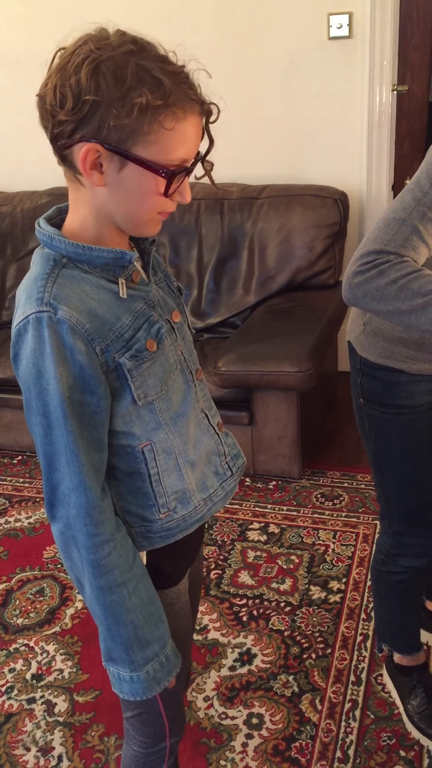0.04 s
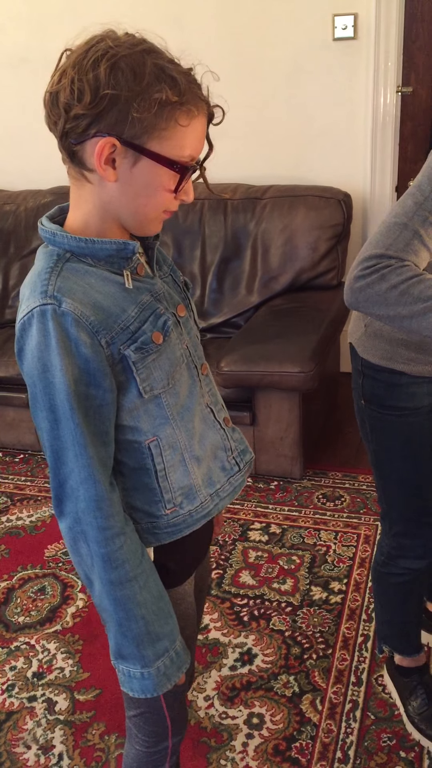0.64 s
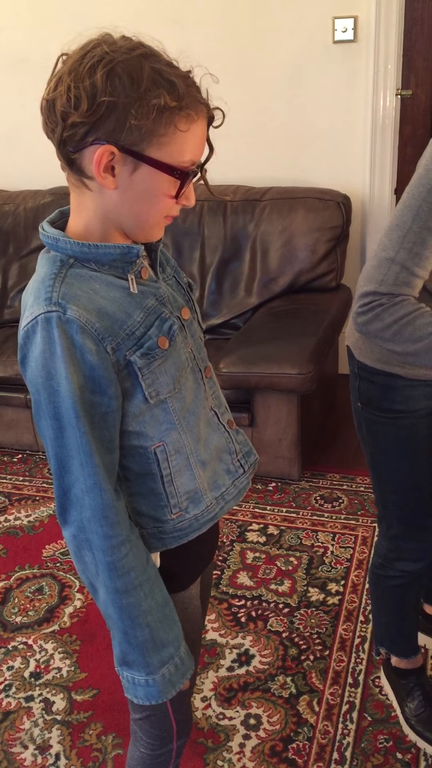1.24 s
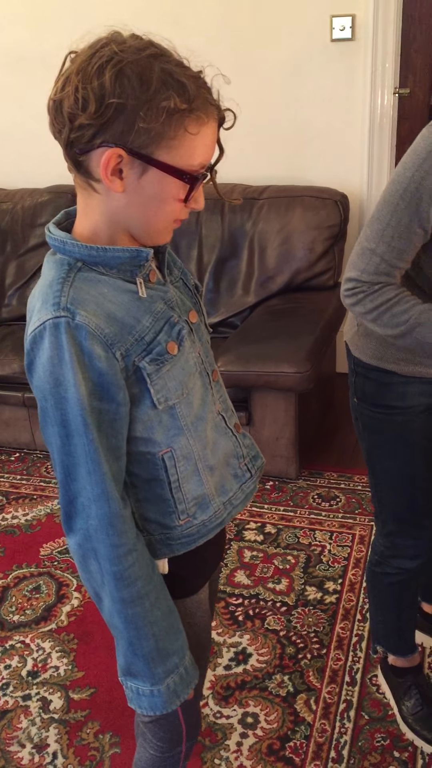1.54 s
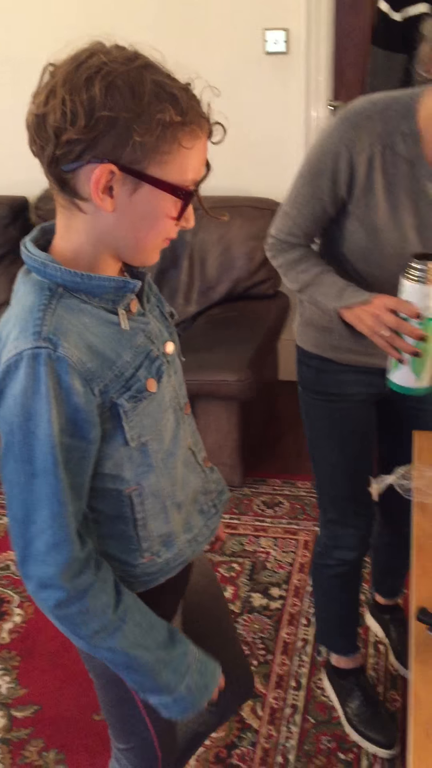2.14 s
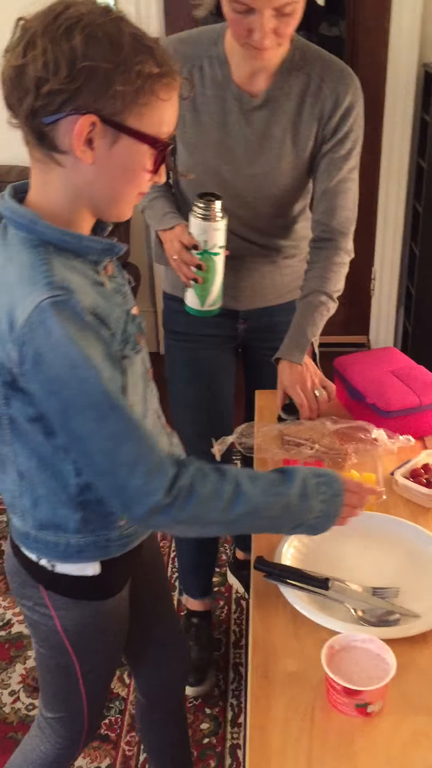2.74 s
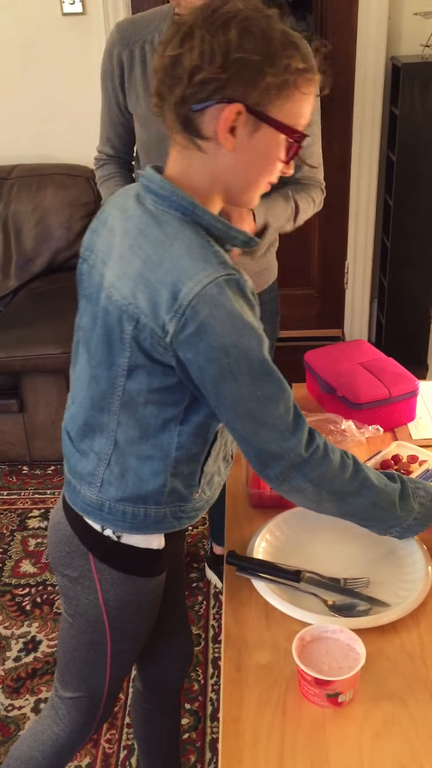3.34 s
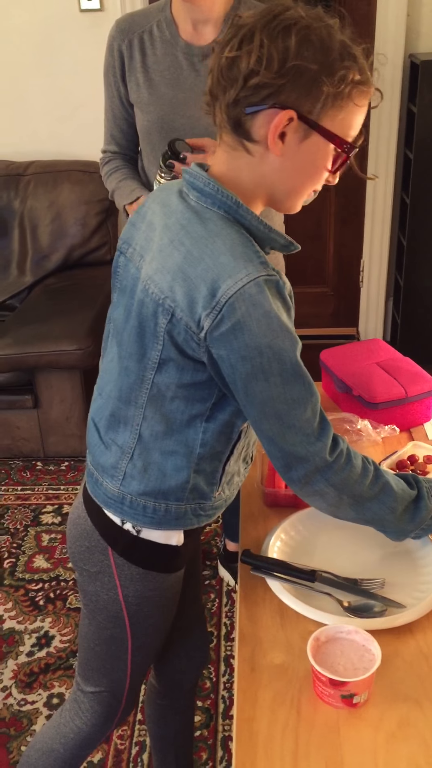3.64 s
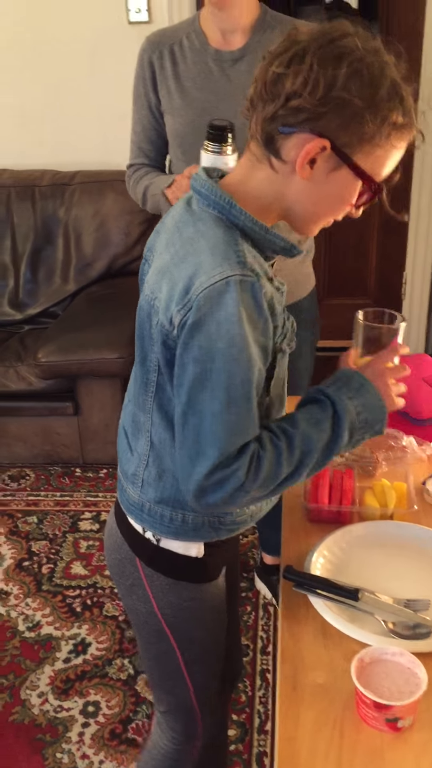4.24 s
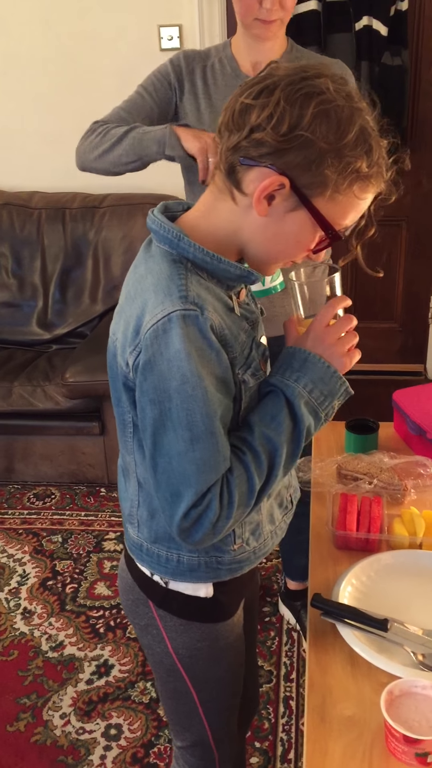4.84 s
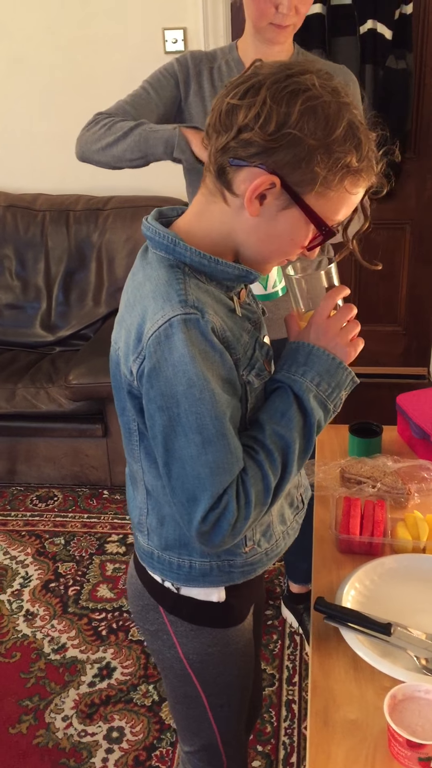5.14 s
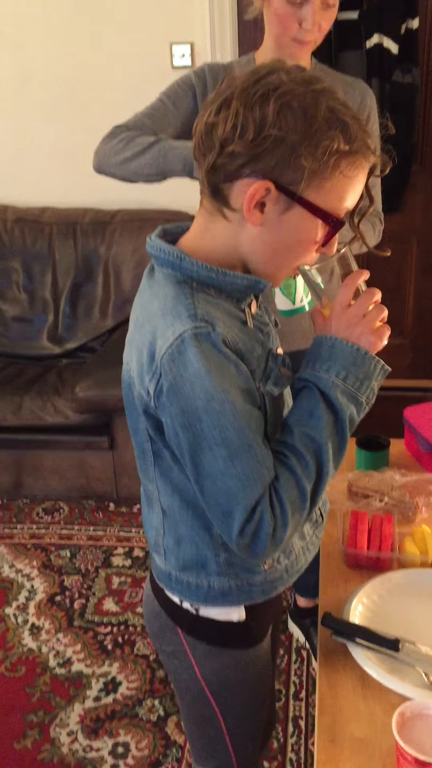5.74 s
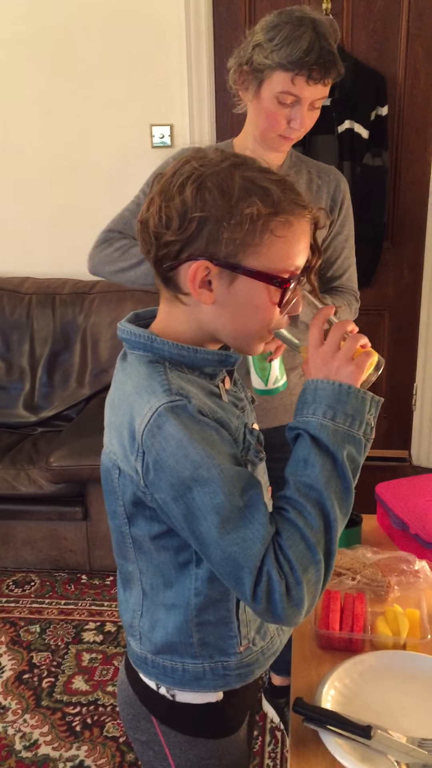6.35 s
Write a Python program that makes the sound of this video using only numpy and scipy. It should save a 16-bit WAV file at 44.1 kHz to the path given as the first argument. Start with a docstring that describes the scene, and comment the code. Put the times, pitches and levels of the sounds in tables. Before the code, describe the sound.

A living room rumbles faintly throughout, with a quiet hiss. Small pings and ticks sound in the first second, and a drinking glass clinks once at about 1.1 seconds. At 1.7 seconds a dull, heavy thump, the loudest sound, sets a wooden table ringing. Hard knocks on the wood follow until about 2.6 seconds. Near 3 seconds food wrap rustles very faintly and things slide softly over the table. From 3.6 to about 4.4 seconds a stopper clinks and rattles in a steel flask in quick, uneven touches, while a container bumps the table with short, low notes. Two knocks near 4.7 seconds leave the table ringing with a hollow note. Faint metallic clinks and ticks continue from 5 to 6 seconds, then only the room remains until about 6.5 seconds. Everything sounds fairly close, with a short room echo.

```python
"""A living room rumbles faintly. Small pings and ticks sound, and a glass clinks once at 1.1 s.
At 1.7 s a dull thump sets a wooden table ringing, and hard knocks on the wood follow.
Near 3 s food wrap rustles and things slide. From 3.6 s a stopper clinks and rattles in a steel flask,
and a container bumps the table. Two knocks near 4.7 s leave the table ringing with a hollow note.
Faint clinks and ticks end it."""
import sys
import numpy as np
from scipy import signal
from scipy.fft import rfft, irfft, next_fast_len
from scipy.io import wavfile

SR = 44100
rng = np.random.default_rng(int(sys.argv[2]) if len(sys.argv) > 2 else 0)


def to_wav(sig):
    """Store sig (one row per channel, or 1-D mono) as 16-bit WAV at the path in sys.argv[1].

    Samples outside -1..1 are clipped; the rate is SR.
    """
    pcm = np.clip(np.atleast_2d(sig), -1, 1) * 32767
    pcm = np.round(pcm).astype(np.int16)
    wavfile.write(sys.argv[1], SR, pcm.T)  # frames by channels


N = 287091
SIZE = 32768   # samples per event
T, HZ = np.arange(SIZE) / SR, np.maximum(np.fft.rfftfreq(SIZE, 1 / SR), 1)


def from_db(db):
    """Decibels to gain."""
    return 10 ** (np.asarray(db) / 20)


def unit(x):
    """Scale to unit energy."""
    return x / np.sqrt(np.sum(x ** 2) + 1e-20)


def at_hz(points, hz):
    """Interpolate a table over log frequency."""
    f, value = np.transpose(points)
    return np.interp(np.log(hz), np.log(f), value)


def swell(time_s, db, half_s):
    """Bell-shaped gain around time_s."""
    return from_db(db) * np.exp(-((np.arange(N) / SR - time_s) / half_s) ** 2)


def add(out, time_s, sound):
    """Mix a sound in at time_s."""
    start = max(round(time_s * SR), 0)
    out[start:start + len(sound)] += sound[:N - start]


def pulse(gain):
    """Minimum-phase pulse with this spectrum; unit energy."""
    cepstrum = irfft(np.log(gain + 1e-9))
    cepstrum[1:SIZE // 2] *= 2
    cepstrum[SIZE // 2 + 1:] = 0
    return unit(irfft(np.exp(rfft(cepstrum))))


def bend(sound, travel_s):
    """Higher bending waves cross a plate faster, smearing a click; travel_s holds at 1 kHz."""
    return irfft(rfft(sound) * np.exp(-4j * np.pi * travel_s * np.sqrt(HZ * 1000)))


def coloured(x, spectrum):
    """Shape a scene-long signal by a spectrum; unit rms."""
    size = next_fast_len(N)
    hz = np.maximum(np.fft.rfftfreq(size, 1 / SR), 1)
    shaped = irfft(rfft(x, size) * from_db(at_hz(spectrum, hz)), size)
    return unit(shaped[:N]) * np.sqrt(N)


def ring(hz, level_db, t60_s, phase):
    """Decaying modes struck together; unit energy."""
    t = T[:SIZE // 2]
    return unit(sum(from_db(db - 60 * t / decay_s) * np.sin(2 * np.pi * f * t + angle)
                    for f, db, decay_s, angle in zip(hz, level_db, t60_s, phase)))


# reverberation decay: (frequency [Hz], t60 [s])
ROOM_DECAY = [(100, 0.14), (400, 0.51), (1000, 0.51), (2800, 0.4751), (7000, 0.32), (15000, 0.29)]
# reverberation spectrum: (frequency [Hz], gain [dB])
ROOM_SPECTRUM = [(100, 8), (300, 4.5), (1200, 1), (2500, 4), (4000, 1.5), (8000, 3.5), (16000, -4.5)]
def room(sound, wet_db, near_db, near_s=0.0018, build_s=0.0039):
    """Direct sound, near reflections off the table and a diffuse tail, new for every spot."""
    centres_hz, t60_s = np.transpose(ROOM_DECAY)
    noise = rfft(rng.standard_normal(SIZE)) * from_db(at_hz(ROOM_SPECTRUM, HZ))
    shares = [np.interp(np.log(HZ), np.log(centres_hz), row) for row in np.eye(len(centres_hz))]
    tail = sum(irfft(noise * share) * from_db(-60 * T / decay_s) for share, decay_s in zip(shares, t60_s))
    tail *= 1 - np.exp(-T / build_s)
    response = from_db(wet_db) * tail / np.sqrt(SR * np.mean(t60_s) / np.log(10 ** 6))
    response += from_db(near_db) * unit(rng.standard_normal(SIZE) * T * np.exp(-2 * T / near_s))
    response[0] += 1
    return signal.fftconvolve(sound, response)[:SIZE]


# room hiss: (frequency [Hz], relative density [dB])
AIR_SPECTRUM = [(20, -36), (45, -5), (130, 0.5), (200, -4.5), (367, -7), (480, -13.5), (920, -14),
                (1330, -18), (1760, -17), (3000, -19.5), (7000, -25), (13500, -30), (16000, -32.5)]
# rumble swells: (peak time [s], half length [s], lower resonance [dB], upper resonance [dB])
RUMBLE_SWELLS = [(1.992, 0.24, -62, -58.5), (3.395, 0.4, -56.5, -66), (5.335, .1, -69, -64),
                 (6.284, 0.18, -66.5, -67.5)]
def background(air_db=-70.5, low_hz=62, low_db=-71.5, high_hz=105, high_db=-70.5, width_hz=15):
    """Quiet hiss, and a rumble wavering in the room's two lowest resonances."""
    out = from_db(air_db) * coloured(rng.standard_normal(N), AIR_SPECTRUM)
    for k, (hz, steady_db) in enumerate([(low_hz, low_db), (high_hz, high_db)]):
        band = signal.butter(2, [hz - width_hz / 2, hz + width_hz / 2], "band", fs=SR, output="sos")
        rumble = signal.sosfilt(band, rng.standard_normal(N + SIZE))[SIZE:]
        swells = sum(swell(time_s, db[k], half_s) for time_s, half_s, *db in RUMBLE_SWELLS)
        out += np.hypot(from_db(steady_db), swells) * rumble / np.std(rumble)
    return out


HANDLING_FROM_S = 2   # a faint, steady rustle starts here
# crinkling film: (frequency [Hz], relative density [dB])
WRAP_SPECTRUM = [(500, -22), (2000, -24), (6000, 6.5), (10000, 7), (13000, 11.5), (16000, 6.5)]
# crinkles: (peak time [s], level [dB], half length [s])
WRAP_SWELLS = [(2.796, -72, 0.048), (2.831, -70, .005), (2.923, -67, 0.048)]
def wrap(creases_per_s=2500, spread_db=2.5, steady_db=-92):
    """Thin food wrap crinkles in tiny snaps."""
    creases = rng.random(N) < creases_per_s / SR
    strength = from_db(spread_db * np.minimum(rng.exponential(1, N), 4))
    snaps = creases * strength * rng.choice([-1, 1], N)
    steady = from_db(steady_db) * (np.arange(N) / SR > HANDLING_FROM_S)
    return (steady + sum(swell(*row) for row in WRAP_SWELLS)) * coloured(snaps, WRAP_SPECTRUM)


# friction on wood: (frequency [Hz], relative density [dB])
SLIDE_SPECTRUM = [(200, -6), (500, -20), (800, -1.5), (1050, 2.5), (1400, -5), (2200, -11.5), (3500, -17),
                  (9000, -24.5)]
# slides: (peak time [s], level [dB], half length [s], pitch [ratio])
SLIDE_SWELLS = [(2.957, -60.5, 0.073, 0.99), (3.246, -73, 0.074, 1.93)]
def slides(steady_db=-81):
    """Things slide over the wood with a soft friction noise."""
    steady = from_db(steady_db) * (np.arange(N) / SR > HANDLING_FROM_S)
    out = steady * coloured(rng.standard_normal(N), SLIDE_SPECTRUM)
    for time_s, db, half_s, pitch in SLIDE_SWELLS:
        friction = coloured(rng.standard_normal(N), np.array(SLIDE_SPECTRUM) * [pitch, 1])
        out += swell(time_s, db, half_s) * friction
    return out


def tick(hz, q, wet_db):
    """A tiny hard contact with one resonance."""
    resonance = 1 / np.hypot(1, q * (HZ / hz - hz / HZ))
    return room(bend(pulse(resonance), travel_s=0.003), wet_db, near_db=-3, near_s=0.003)


# ticks: (time [s], level [dB], centre [Hz], Q [-])
TICK_EVENTS = [(0.633, -45, 1820, 7.4), (1.715, -33.5, 6760, 3.2), (2.04, -46, 5670, 1.5),
               (3.917, -20, 3940, 17), (4.959, -35, 3560, 31), (5.309, -31.5, 3460, 14),
               (5.445, -46.5, 12500, 6.2), (5.925, -37.5, 8150, 4.4)]
def ticks():
    """Scattered small, sharp contacts."""
    out = np.zeros(N)
    for time_s, db, hz, q in TICK_EVENTS:
        add(out, time_s, from_db(db) * tick(hz, q, wet_db=-7.5))
    return out


def ping(hz, length_s):
    """A tone that swells and is damped within milliseconds."""
    return unit(np.sin(2 * np.pi * hz * T) * np.sin(np.pi * np.minimum(T / length_s, 1)))


# pings: (time [s], frequency [Hz], level [dB])
PING_EVENTS = [(0.0, 1856, -36), (0.075, 2320, -43.5), (.319, 920, -47), (0.946, 940, -37.5),
               (.948, 1300, -40), (3.512, 1015, -40.5), (3.607, 1023, -29.5)]
def pings(cycles=14):
    """Faint pings and squeaks, all the same number of cycles long."""
    out = np.zeros(N)
    for time_s, hz, db in PING_EVENTS:
        add(out, time_s, from_db(db) * room(ping(hz, cycles / hz), wet_db=-1, near_db=-30))
    return out


# drinking glass: (frequency [Hz], relative level [dB], length [s])
GLASS_PARTIALS = [(1609, -1.5, 0.013), (1518, -9.5, 0.018), (3150, -31, 0.012), (4050, -23, 0.0049),
                  (5300, -17.5, 0.018), (5610, -14.5, 0.011), (6130, -31, 0.0074)]
def glass(time_s=1.0795, ring_db=-13, tick_db=-48):
    """One bright clink: a contact tick and quickly damped partials."""
    out = np.zeros(N)
    partials = sum(from_db(db) * ping(hz, length_s) for hz, db, length_s in GLASS_PARTIALS)
    add(out, time_s, from_db(ring_db) * room(partials, wet_db=-4, near_db=-6))
    add(out, time_s, from_db(tick_db) * tick(hz=6860, q=0.26, wet_db=10.5))
    return out


# hollow notes: (time [s], level [dB], frequency [Hz])
HOLLOW_NOTES = [(2.0600, -14, 292), (3.755, -16.5, 330), (3.770, -26, 433), (3.847, -29, 324),
                (3.9187, -21, 310), (3.94, -20.5, 221), (4.648, -19, 418), (4.721, -18, 473)]
def hollow_notes(t60_s=0.1, highpass_hz=120):
    """Short, low notes from a bumped container, and from the table ringing after the knocks near 4.7 s."""
    out = np.zeros(N)
    for time_s, db, hz in HOLLOW_NOTES:
        note = ring([hz], [0], [t60_s], [0])
        add(out, time_s, from_db(db) * room(note, wet_db=-10, near_db=-6))
    return signal.sosfilt(signal.butter(2, highpass_hz, "high", fs=SR, output="sos"), out)


# steel clatter: (frequency [Hz], relative density [dB])
CLATTER_SPECTRUM = [(200, -10), (600, -6), (1100, 5), (1900, -6), (2800, -3), (3900, 1), (5000, -7.5),
                    (7000, -8.5), (10000, -16.5), (13000, -12.5), (16000, -28)]
def flask_wall(height_db=12, width_hz=50, count=32):
    """Gain in dB of a thin wall with many unevenly spaced high resonances."""
    peaks_hz = np.linspace(4500, 15800, count) + rng.uniform(-100, 100, count)
    peaks_db = height_db * rng.uniform(0.5, 1.5, count)
    resonances_db = sum(db / (1 + (2 * (HZ - hz) / width_hz) ** 2) for hz, db in zip(peaks_hz, peaks_db))
    return at_hz(CLATTER_SPECTRUM, HZ) + resonances_db


USUAL_RUB_S = 0.0058
# steel flask: (frequency [Hz], level struck at neck [dB], level struck at rim [dB], unheld t60 [s])
FLASK_MODES = [(1023, -.5, -8, .08), (2132, -23, -8, .19), (2171, -25, -4, .25), (3416, -1, -11, .12),
               (3568, -13, -8, .14), (4318, -16, -21, .16), (5717, -24, -9, .11), (6440, -19, -8, .1),
               (7438, -15, -22, .11), (624, -17, -24, .17), (890, -7, -14, .06), (1125, -8, -4, .08),
               (1270, -14, -12, .08), (1486, -13, -21, .13), (1572, -14, -17, .12), (1906, -18, -11, .08),
               (2245, -15, -7, .13), (3370, -4, -15, .05), (3850, -14, -22, .07), (4630, -16, -22, .1),
               (5120, -14, -19, .07), (5486, -17, -20, .09), (6115, -19, -12, .05), (7634, -25, -16, .1),
               (8090, -25, -17, .08), (8690, -22, -18, .07), (9450, -25, -18, .09), (11270, -27, -14, .07),
               (12140, -27, -16, .07), (15050, -33, -17, .06)]
def flask_touch(wall_db, place, tilt_db_per_oct, focus_hz, rub_s,
                focus_db=9, focus_q=7, scatter_db=1.5, grip_detune=0.0037, clatter_t60_s=0.068):
    """A touch rings clear modes and a dense clatter; a longer rub is duller and clatters more."""
    hz, neck_db, rim_db, t60_s = np.transpose(FLASK_MODES)
    mode_db = (1 - place) * neck_db + place * rim_db + tilt_db_per_oct * np.log2(hz)
    mode_db += scatter_db * rng.standard_normal(len(hz))
    hz = hz * (1 + grip_detune * rng.standard_normal(len(hz)))
    cutoff_hz = 9800 * np.sqrt(USUAL_RUB_S / rub_s)
    rolloff_db = -10 * np.log10(1 + (HZ / cutoff_hz) ** 4)
    emphasis_db = focus_db / (1 + (focus_q * (HZ / focus_hz - focus_hz / HZ)) ** 2)
    mode_db += np.interp(hz, HZ, rolloff_db + 0.4 * emphasis_db)
    held_t60_s = 0.79 * t60_s   # the hand damps the steel
    clear = ring(hz, mode_db, held_t60_s, np.pi * rng.integers(0, 2, len(hz)))
    slope_db = tilt_db_per_oct * np.log2(np.maximum(HZ, hz[0]))
    contact = pulse(from_db(wall_db + emphasis_db + rolloff_db + slope_db))
    dense_modes = rng.standard_normal(SIZE) * from_db(-60 * T / clatter_t60_s)
    clatter = unit(signal.fftconvolve(contact, dense_modes)[:len(clear)])
    clatter_db = 0.5 + 3 * np.log2(rub_s / USUAL_RUB_S)
    attack = np.minimum(T[:len(clear)] / rub_s, 1)
    return room(unit(attack * (clear + from_db(clatter_db) * clatter)), wet_db=-2, near_db=-16)


# rattles: (time [s], first touch level [dB], emphasis [Hz])
RATTLE_RUNS = [(3.614, -36.5, 4550), (3.700, -17.5, 5100), (3.926, -23, 3950)]
def stopper_rattles(wall_db, touches=4, gap_s=0.018, loss_db=4):
    """The stopper rattles in the neck in dying runs of light touches."""
    out = np.zeros(N)
    for time_s, db, focus_hz in RATTLE_RUNS:
        for k in range(touches):
            touch = flask_touch(wall_db, place=0.046, tilt_db_per_oct=-2, focus_hz=focus_hz, rub_s=0.0056)
            add(out, time_s + k * gap_s, from_db(db - k * loss_db) * touch)
    return out


# stopper on steel: (time [s], level [dB], place [0 neck, 1 rim], emphasis [Hz], rub time [s])
STOPPER_TOUCHES = [(3.6060, -29, .02, 1070, 0.025), (3.6848, -11.5, .02, 940, 0.0027),
                   (3.7550, -15.5, 0.24, 1360, 0.008), (3.8390, -21.5, 0.3, 1140, 0.0021),
                   (3.9160, -14, .37, 3340, 0.0032), (3.9820, -19.5, 0.4, 1160, 0.015),
                   (4.2310, -24.5, .2, 7350, 0.0077), (4.2635, -20, 0.26, 6470, 0.0032),
                   (4.3715, -12, 0.77, 2220, 0.0011), (4.4360, -29, .6, 3670, 0.0087),
                   (4.9570, -36, 0.63, 3500, 0.009), (5.2400, -30, 0.73, 964, 0.038),
                   (5.3060, -28.5, .75, 2330, 0.014), (5.5800, -36, 0.47, 985, 0.05)]
def stopper_clinks(wall_db, firm_db=-10.5):
    """Firmer touches are brighter; a clean hit starts with a high snap that a rubbing one loses."""
    out = np.zeros(N)
    for time_s, db, place, focus_hz, rub_s in STOPPER_TOUCHES:
        rub_doublings = np.log2(rub_s / USUAL_RUB_S)
        tilt_db_per_oct = -2.66 + 0.08 * (db - firm_db) - rub_doublings
        add(out, time_s, from_db(db) * flask_touch(wall_db, place, tilt_db_per_oct, focus_hz, rub_s))
        snap_db = db - 32.5 - 5.5 * rub_doublings
        add(out, time_s, from_db(snap_db) * tick(hz=13400, q=0.84, wet_db=11))
    return out


# table top: (frequency [Hz], relative level [dB], t60 [s])
TABLE_MODES = [(111, -1, 0.26), (147, 4, 0.072), (168.5, -4.5, 0.3), (202, -11.5, 0.41),
               (241.7, -7.5, 0.25), (288, -33, 0.31), (440, -35, 0.35), (467, -38, 0.21), (651, -31, 0.095)]
# heavy, soft blows: (time [s], level [dB], tilt [dB/octave])
THUMP_BLOWS = [(1.7150, 7.5, -10.5), (1.863, -7, 0.5), (2.054, -41, 10), (4.639, -25, -6),
               (4.708, -11.5, -25)]
def thumps(radiates_above_hz=80):
    """The table's upper modes start against the lowest one, so the boom swells for a cycle."""
    out = np.zeros(N)
    hz, mode_db, t60_s = np.transpose(TABLE_MODES)
    for time_s, db, tilt_db_per_oct in THUMP_BLOWS:
        boom = ring(hz, mode_db + tilt_db_per_oct * np.log2(hz), t60_s, np.pi * (hz > hz[0]))
        add(out, time_s, from_db(db) * room(boom, wet_db=-14, near_db=-26))
    # the boom is cut below about 80 Hz, so no deep rumble lingers under it
    return signal.sosfilt(signal.butter(2, radiates_above_hz, "high", fs=SR, output="sos"), out)


# struck wood: (frequency [Hz], relative density [dB])
WOOD_SPECTRUM = [(100, 6.5), (300, 6), (430, 1), (520, -7), (680, 0), (1300, 5), (2000, 0.5), (2700, -3),
                 (3500, -2), (6000, -9.5), (10000, -12.5), (16000, -18)]
# upper resonances of the wood: (frequency [Hz], width [Hz], gain [dB])
WOOD_RESONANCES = [(284, 12, 1.5), (429, 66, 5), (622, 84, 7), (932, 320, 4), (1352, 20, -2),
                   (1593, 19, 5.5)]
def knock(weight, contact_hz, wet_db):
    """One hard pulse on wood: the heavier the thing, the deeper, darker and more drawn out."""
    body_hz = 235 * (116 / 235) ** weight
    tilt_db_per_oct = np.interp(weight, [0, 1], [2.68, -5])
    travel_s = np.interp(weight, [0, 1], [0.001214, 0.003083])
    peaks_db = sum(db / (1 + (2 * (HZ - hz) / width_hz) ** 2) for hz, width_hz, db in WOOD_RESONANCES)
    gain = from_db(at_hz(WOOD_SPECTRUM, HZ) + peaks_db + tilt_db_per_oct * np.log2(HZ))
    gain /= np.sqrt((1 + (body_hz / HZ) ** 6) * (1 + (HZ / contact_hz) ** 5))
    return room(bend(pulse(gain), travel_s), wet_db, near_db=-1, near_s=0.002)


# landings: (time [s], level [dB], weight [0 light, 1 heavy], contact cut-off [Hz], reverb [dB],
# settling relative to the hit [dB])
KNOCK_HITS = [(1.7119, -8.5, 0.89, 4500, -1, -17), (1.8611, -27, 0.84, 2400, -2, -8),
              (2.0509, -18.5, 0.38, 3100, 7, -7), (2.0850, -16.5, 0.487, 4700, -1, -15),
              (2.5744, -12.5, 0.074, 4700, 1.5, -14), (2.8230, -40, .45, 2500, 9.5, -2),
              (3.7550, -30.5, 0.36, 1300, 1, -12), (4.233, -31, 0.52, 1150, 1.5, -5),
              (4.6318, -20.5, 0.79, 3540, 11, -6), (4.703, -13.5, 0.37, 4480, -4.5, -2.5)]
def knocks(settle_s=0.017):
    """Each thing hits the wood with an edge, then settles flat."""
    out = np.zeros(N)
    for time_s, db, weight, contact_hz, wet_db, settle_db in KNOCK_HITS:
        add(out, time_s, from_db(db) * knock(weight, contact_hz, wet_db))
        settling = knock(weight=0.651, contact_hz=1290, wet_db=0.5)
        add(out, time_s + settle_s, from_db(db + settle_db) * settling)
    return out


def scene():
    """Mono sum of all sources."""
    table = knocks() + thumps() + hollow_notes()
    wall_db = flask_wall()
    flask = stopper_clinks(wall_db) + stopper_rattles(wall_db)
    return (table + flask + glass() + pings() + ticks() + wrap() + slides() + background())[None]


def record(dry, cutoff_hz=15900):
    """Steep low-pass."""
    return signal.sosfilt(signal.ellip(10, 0.1, 70, cutoff_hz, fs=SR, output="sos"), dry)


dry = scene()
out = record(dry)
to_wav(out)
```